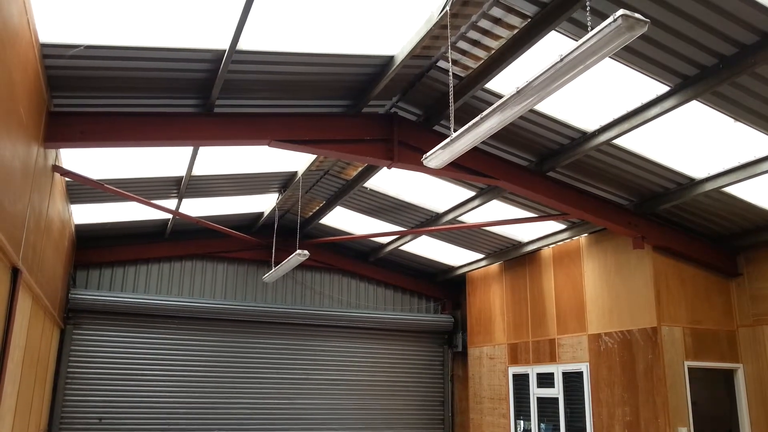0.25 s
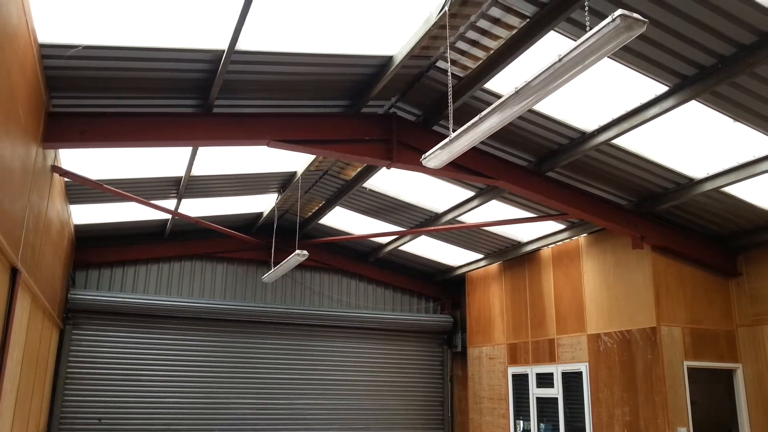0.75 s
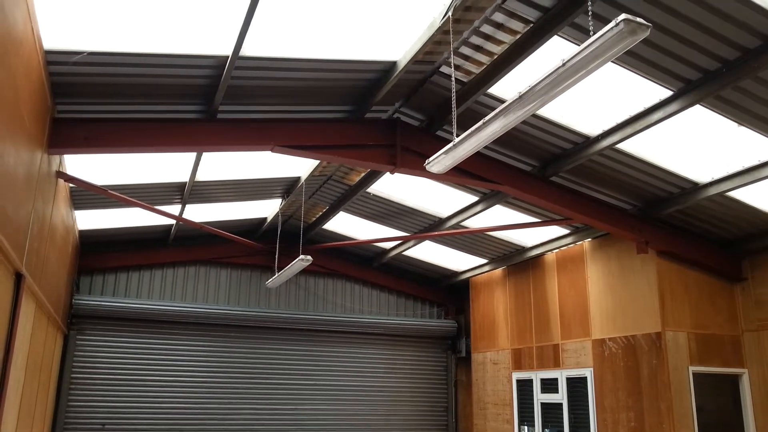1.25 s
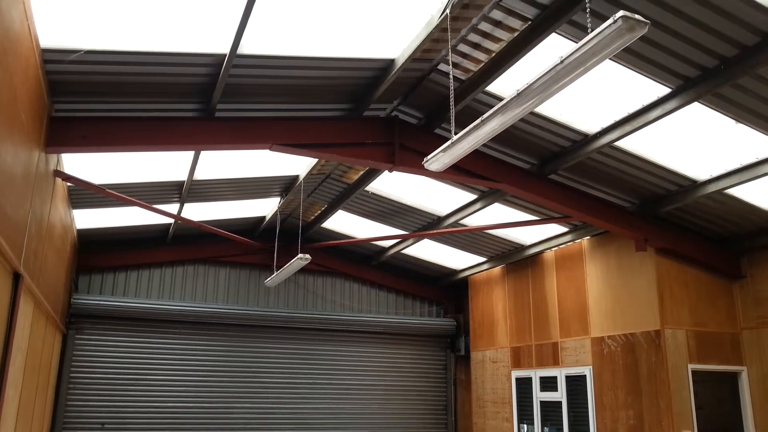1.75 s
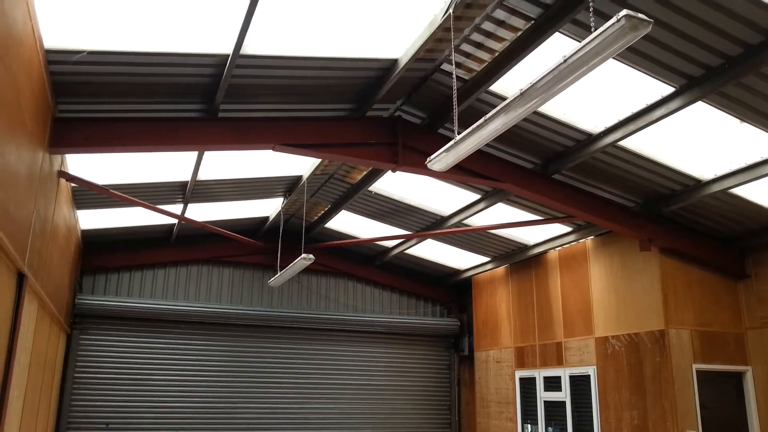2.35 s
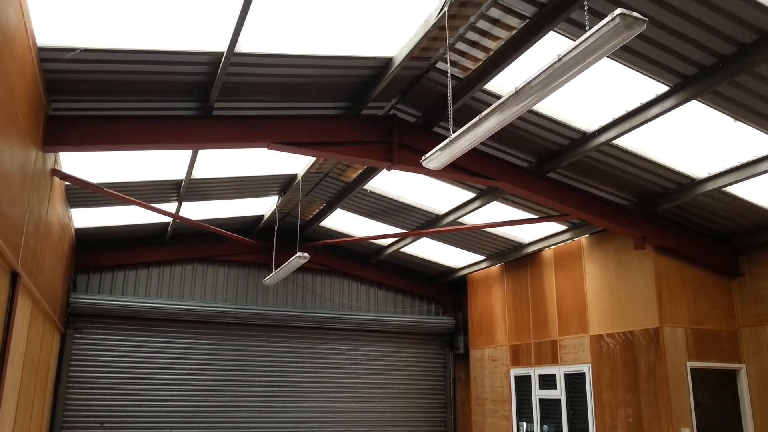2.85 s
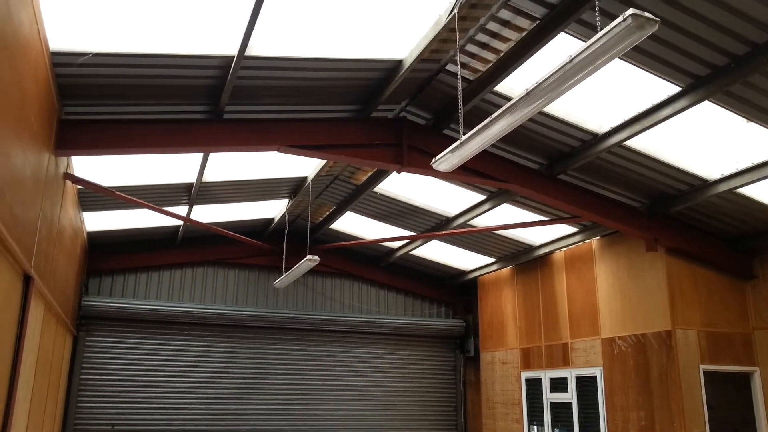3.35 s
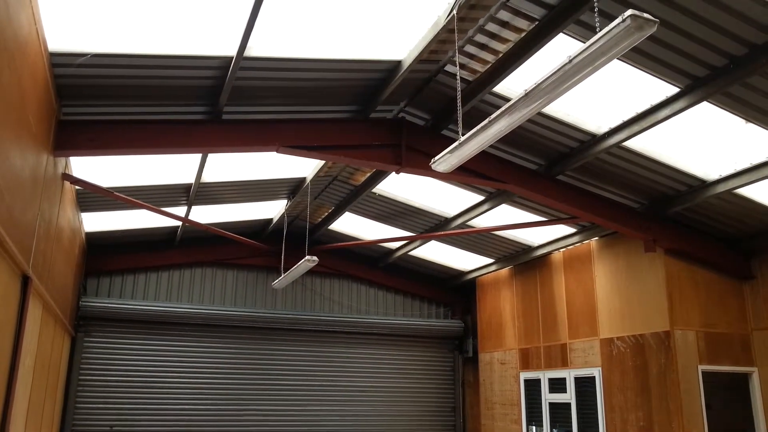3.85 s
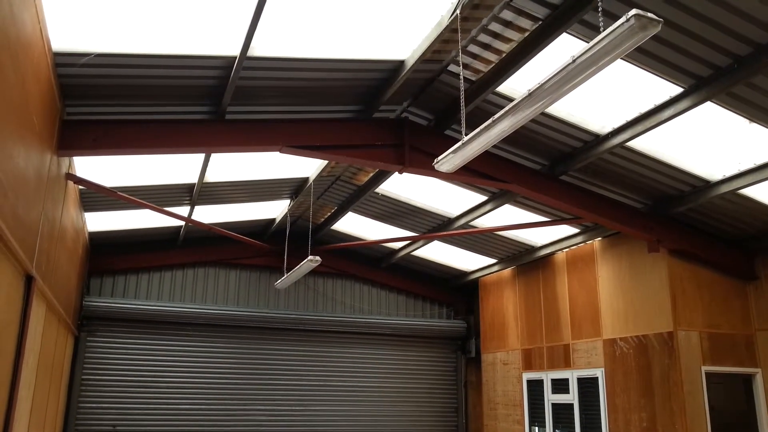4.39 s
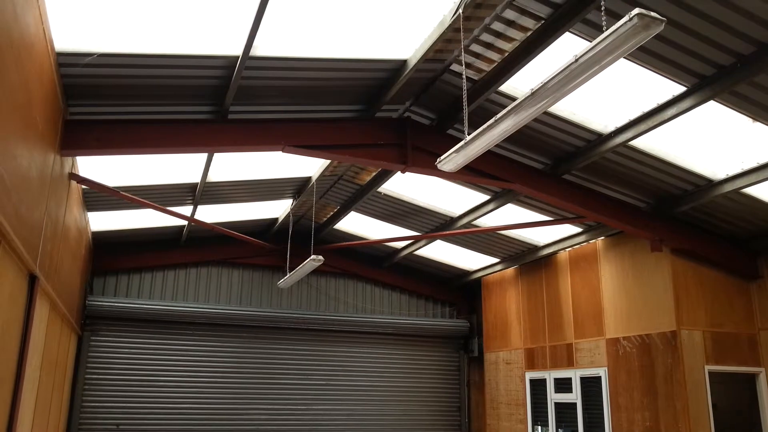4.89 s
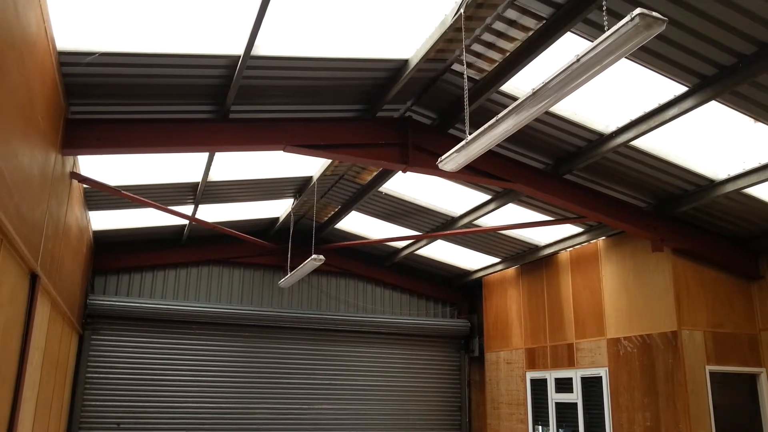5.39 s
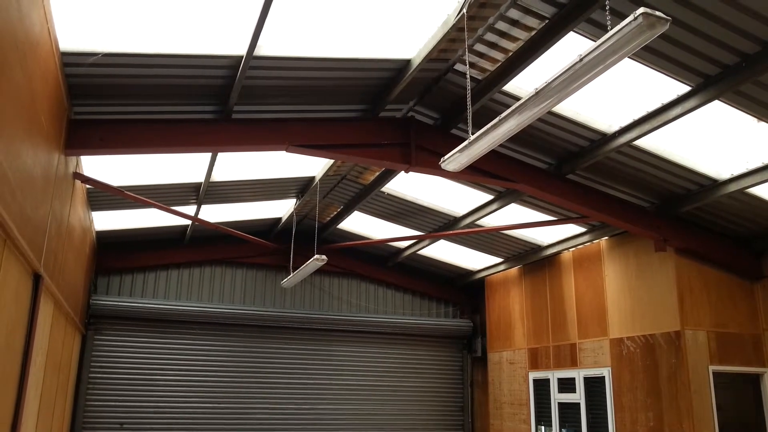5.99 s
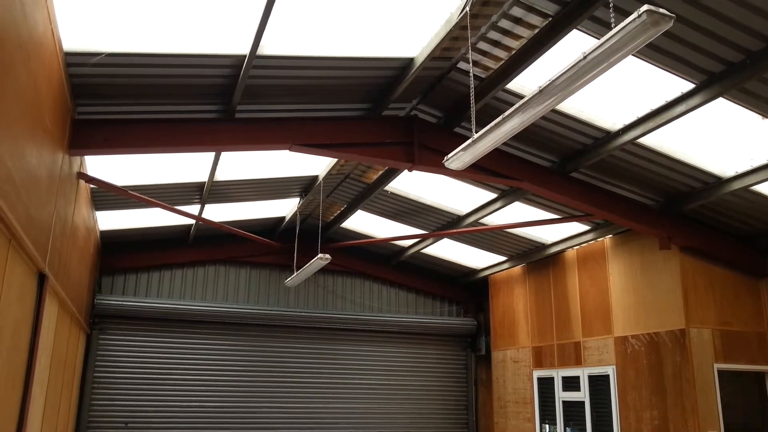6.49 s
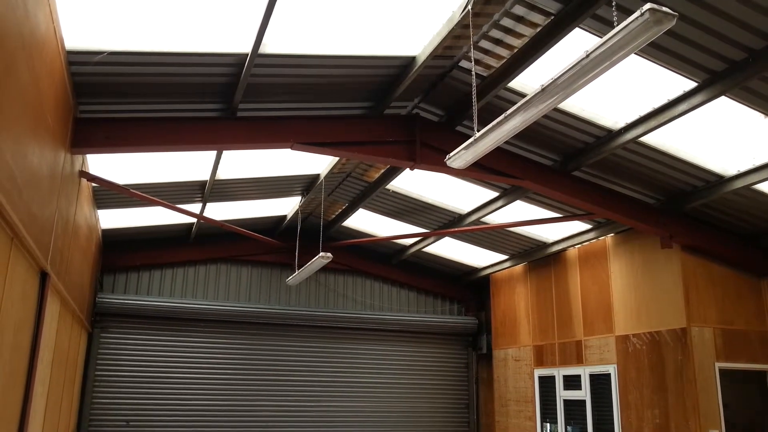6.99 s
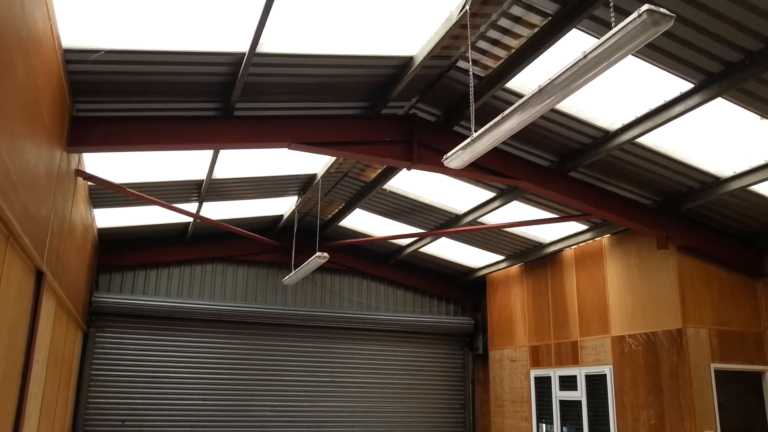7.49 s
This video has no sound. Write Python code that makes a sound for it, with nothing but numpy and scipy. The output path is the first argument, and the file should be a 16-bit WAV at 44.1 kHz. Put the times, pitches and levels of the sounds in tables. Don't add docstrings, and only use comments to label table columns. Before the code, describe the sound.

Swallows under a sheet-metal roof: the ring of a just-ended note, then one close bird chattering in tiny quick phrases, mostly rising, with short gaps. Two faint dull knocks on board come from the yard. Two more distant birds follow with sparser chirps, densest around the middle and then thinning out, with a soft murmur of others. Stereo microphone in an echoing shed, constant low hum and light hiss.

```python
import sys
import numpy as np
from scipy import signal
from scipy.fft import rfft, irfft
from scipy.io import wavfile
from scipy.ndimage import uniform_filter1d

SR = 44100
rng = np.random.default_rng(int(sys.argv[2]) if len(sys.argv) > 2 else 0)


def generate_wav(signal):
    frames = np.transpose(np.atleast_2d(signal))
    scaled = np.clip(frames, -1, 1) * 32767
    pcm = np.round(scaled).astype(np.int16)
    wavfile.write(sys.argv[1], SR, pcm)


def volts_from_decibels(level):
    exponent = np.asarray(level, float) / 20
    return 10 ** exponent


N = 341334


def evened(x):
    return x / np.sqrt(np.mean(x ** 2) + 1e-20)


def read(points, hz):
    f, value = np.transpose(points)
    return np.interp(np.log(hz + 1), np.log(f + 1), value)


def add(mix, s, sound):
    part = mix[..., round(s * SR):][..., :sound.shape[-1]]
    part += sound[..., :part.shape[-1]]


HOLD, STEP, SWEEP, LEAP = (1.05, 0.51), (1.15, 0.85), (1.3, 0.79), (1.55, 0.75)
DROP, DIVE = (.93, 1.204), (.88, 1.1)
HIGH_CHIRP, LOW_CHIRP = (1.11, 2.01), (1.12, 0.508)
HIGH_PIP, LOW_PIP = (1.01, .9), (1.02, .5)


def sung(*parts):
    notes = []
    for (rise, bend), rows in parts:
        for s, length, hz, db in rows:
            notes.append((s, length, hz / rise, hz, db, bend))
    return notes


# frequency in Hz, right over left level in dB.
PERCH_LEAN_DB = [(2500, 4.5), (3800, -1.5), (4800, 5.5), (7500, 3), (12000, -4.5)]


def birds(notes, second_db, third_db, quaver, rasp_db, rasp_hz, late):
    out = np.zeros(N)
    shake, air = rng.standard_normal((2, N + SR))
    shake = evened(uniform_filter1d(uniform_filter1d(shake, 60), 60))
    air = evened(signal.lfilter([1], [1, -np.exp(-2 * np.pi * rasp_hz / SR)], air))
    flutter = 0.11 * np.sin(2 * np.pi * np.cumsum(210 * (1 + 0.202 * shake)) / SR)
    for s, length, start_hz, end_hz, db, bend in notes:
        u = np.arange(0, 1, 1 / (length * SR))
        span = slice(round(s * SR), round(s * SR) + len(u))
        hz = start_hz + (end_hz - start_hz) * u ** bend
        turn = 2 * np.pi * np.cumsum(hz * (1 + quaver * shake[span])) / SR
        swell = np.sin(np.pi * u ** late) ** 0.36
        swell *= 1 + flutter[span]
        second = volts_from_decibels(second_db) * np.sin(2 * turn)
        third = volts_from_decibels(third_db) * np.sin(3 * turn) * (3 * hz < SR / 2)
        hoarse_db = np.clip(1.9 * (-36.0 - db), 0, 16)
        rasp = volts_from_decibels(rasp_db + hoarse_db) * air[span]
        add(out, s, volts_from_decibels(db) * swell * ((1 + rasp) * np.sin(turn) + swell * (second + third)))
    lean = volts_from_decibels(read(PERCH_LEAN_DB, np.fft.rfftfreq(N, 1 / SR)) / 2)
    return irfft(rfft(out) * np.array([1 / lean, lean]), N)


# frequency in Hz, time to fall 60 dB in seconds.
SHED_T60 = [(300, 1), (1500, 0.52), (3000, 1), (5000, 0.7), (7000, 0.59), (14000, 0.88)]
# delay in seconds, left level in dB, right level in dB.
FIRST_ECHOES = [(.0022, -6, -8), (.0041, -8, -6), (.0063, -8, -10), (.0087, -10, -9), (.0118, -10, -11),
                (.016, -11, -10), (.024, -10, -11), (.031, -11, -10)]


def shed(x, first_db, tail_db, alike):
    taps = np.zeros((2, SR))
    at = np.arange(260, SR - 20, 20) + rng.integers(0, 20, (2, (SR - 261) // 20))
    np.put_along_axis(taps, at, rng.choice([-1., 1.], at.shape), 1)
    taps[1] = alike * taps[0] + np.sqrt(1 - alike ** 2) * taps[1]
    hz, t, z = signal.stft(taps, SR, nperseg=256)
    decay = volts_from_decibels(-60 * t / read(SHED_T60, hz)[:, None])
    tail = signal.istft(z * decay, SR, nperseg=256)[1][:, :SR]
    tail *= volts_from_decibels(tail_db) / np.linalg.norm(tail[0])
    tail[:, 0] += volts_from_decibels(first_db)
    for delay, left_db, right_db in FIRST_ECHOES:
        echo = volts_from_decibels(first_db + np.array([left_db, right_db])) * rng.choice([-1, 1], 2)
        tail[:, round(delay * SR * rng.uniform(.9, 1.1))] += echo
    tail[1] = np.roll(tail[1], 8)
    return signal.fftconvolve(x, tail, axes=1)[:, :N]


# start in seconds, length in seconds, start pitch in Hz,
# end pitch in Hz, level in dB, bend as a bare exponent.
FADING_NOTE = [
    (0, 0.0108, 4300, 5100, -35, 1),
]


def fading_note():
    voice = birds(FADING_NOTE, second_db=-40, third_db=-48, quaver=0.072, rasp_db=-5.0, rasp_hz=700, late=0.36)
    return shed(voice, first_db=-4.0, tail_db=2.5, alike=0.14)


# frequency in Hz, density in dB per Hz.
HUM_SPECTRUM = [(12, -47.5), (20, -28.5), (245, -2.5), (393, -2.5), (427, -3), (519, -4), (667, -3),
                (811, -3), (3260, -15), (3640, -5.5), (4950, -13), (13900, -18.5), (15500, -24)]
# frequency in Hz, left-right likeness from -1 to 1.
HUM_LIKENESS = [(60, 0.13), (240, 0.68), (950, 0.11), (3770, -0.017), (15000, -0.031)]
# frequency in Hz, left over right level in dB.
HUM_LEAN_DB = [(60, 0.5), (240, -0.5), (950, -2), (3770, -1.5), (15000, -4.5)]


def hum():
    frames, hz = N // 256 + 5, np.fft.rfftfreq(1024, 1 / SR)
    a, b, c, d, patches = rng.standard_normal((frames, 513, 5)).T
    patches = evened(uniform_filter1d(uniform_filter1d(patches, 12, 0), 20, 1))
    t = np.arange(frames) * 256 / SR
    swell = np.zeros(frames)
    for f in np.geomspace(.15, 3, 20):
        swell += np.sin(2 * np.pi * (f * t + rng.random())) / np.sqrt(f)
    same = np.clip(read(HUM_LIKENESS, hz), -1, 1)[:, None]
    left = a + 1j * b
    z = np.array([left, same * left + np.sqrt(1 - same ** 2) * (c + 1j * d)])
    lean_db = read(HUM_LEAN_DB, hz)[:, None] * np.array([.5, -.5])[:, None, None]
    z *= volts_from_decibels(read(HUM_SPECTRUM, hz)[:, None] + lean_db + 1.05 * patches + 0.21 * evened(swell))
    return volts_from_decibels(-49.5) * evened(signal.istft(z, nperseg=1024, noverlap=768)[1][:, :N])


# start in seconds, length in seconds, end pitch in Hz, level in dB.
NEAR_HOLDS = [(0.36, 0.015, 5920, -23.5), (0.479, 0.011, 4790, -19.5), (.577, 0.012, 5150, -14),
              (0.729, 0.018, 5525, -25.5), (1.428, 0.017, 4800, -22.5), (1.704, .006, 4490, -11.5),
              (1.19, 0.0156, 4830, -26), (1.699, 0.023, 4703, -14), (1.731, 0.0171, 5228, -15.5),
              (2.127, 0.043, 3713, -27), (2.172, 0.012, 4639, -12), (2.271, 0.012, 3656, -19),
              (2.199, 0.012, 5160, -15.5), (2.58, .026, 4000, -19.5), (2.571, 0.015, 4517, -26.5),
              (2.719, 0.027, 4554, -21.5), (2.721, 0.0124, 2270, -35.5), (2.742, 0.0082, 3210, -32),
              (2.8, 0.0163, 4560, -22.5), (2.99, 0.012, 3334, -30.5), (3.178, .008, 3290, -26),
              (3.249, 0.0084, 3196, -28), (2.006, 0.021, 4200, -22), (3.408, 0.012, 6322, -37),
              (3.412, .01, 7210, -38.5), (3.283, 0.013, 4680, -21)]
# start in seconds, length in seconds, end pitch in Hz, level in dB.
NEAR_STEPS = [(.254, 0.011, 6230, -25.5), (.325, 0.022, 5500, -30), (.256, .014, 4400, -27.5),
              (.352, .012, 5460, -23.5), (0.787, 0.015, 4275, -25.5), (0.802, 0.023, 4650, -24),
              (1.124, 0.019, 5580, -35), (1.211, 0.024, 5562, -20), (1.336, 0.0045, 3730, -23.5),
              (1.361, 0.014, 3920, -27), (1.519, 0.014, 3915, -18.5), (1.851, 0.012, 3311, -35.5),
              (1.887, 0.0071, 3770, -25), (2.03, 0.024, 4937, -20), (2.354, 0.011, 3700, -19.5),
              (2.33, 0.0135, 4370, -18.5), (2.703, 0.0075, 3530, -21.5), (2.802, .012, 7450, -38),
              (2.736, 0.017, 6800, -35.5), (3.248, 0.012, 4210, -24), (3.377, 0.045, 4596, -33.5),
              (3.393, 0.052, 5300, -29), (1.549, 0.0049, 3490, -16.5), (1.555, 0.007, 3900, -20.5),
              (0.782, 0.016, 6870, -41), (1.99, 0.0266, 4260, -32)]
# start in seconds, length in seconds, end pitch in Hz, level in dB.
NEAR_SWEEPS = [(0.148, 0.0075, 5420, -30), (0.724, 0.016, 4330, -23), (.824, 0.014, 5180, -12.5),
               (1.123, 0.012, 4430, -18.5), (1.359, 0.008, 8200, -29), (1.442, 0.021, 5747, -13.5),
               (1.691, 0.015, 4750, -12.5), (1.723, 0.027, 8460, -41), (1.73, 0.0066, 7060, -34),
               (2.043, 0.017, 3923, -15), (2.152, 0.02, 4810, -11), (2.198, 0.013, 4190, -13),
               (2.264, 0.0079, 3685, -19), (2.597, 0.0173, 5211, -21.5), (2.805, 0.0113, 4390, -18),
               (2.842, 0.011, 5300, -24.5), (3.002, 0.012, 4220, -20), (3.033, 0.015, 5278, -21.5),
               (3.208, .012, 4000, -25), (3.18, 0.0323, 5210, -30), (3.17, .05, 2643, -39.5),
               (3.383, 0.0242, 2820, -38), (3.19, .014, 3680, -29), (3.271, 0.015, 4881, -18.5),
               (3.256, 0.021, 8100, -52), (3.409, 0.015, 3520, -32.5), (0.467, 0.015, 4850, -20.5),
               (.566, 0.011, 5125, -14), (1.728, 0.01187, 4175, -12.5), (1.862, 0.0249, 4266, -28.5),
               (1.45, .014, 4714, -17.5)]
# start in seconds, length in seconds, end pitch in Hz, level in dB.
NEAR_LEAPS = [(.139, 0.023, 6170, -29), (0.236, 0.023, 5580, -28.5), (.47, 0.007, 6700, -22.5),
              (.565, 0.007, 7556, -26), (0.728, 0.012, 5560, -22.5), (0.821, 0.0085, 7390, -28),
              (1.34, 0.028, 5600, -23.5), (1.356, 0.01614, 5800, -13), (1.875, 0.022, 3620, -24.5),
              (2.252, 0.0165, 2678, -29.5), (2.322, 0.038, 5140, -29.5), (2.736, 0.017, 7250, -27),
              (2.837, 0.014, 4274, -20.5), (3.205, 0.015, 7500, -40), (3.41, 0.0132, 7400, -42)]
# start in seconds, length in seconds, end pitch in Hz, level in dB.
NEAR_DROPS = [(0.53, 0.027, 4750, -25), (.452, 0.017, 3200, -31), (1.075, 0.038, 3060, -43),
              (.469, 0.01, 5100, -25), (1.084, 0.045, 3850, -28.5), (1.789, 0.0092, 3270, -17.5),
              (2.034, 0.011, 7170, -40.5), (2.685, 0.014, 2750, -37), (2.683, 0.008, 7100, -38),
              (3.014, 0.018, 4020, -17.5), (0.64, 0.0269, 4000, -22.5), (2.2, 0.0242, 3360, -26),
              (2.787, .011, 3880, -19.5), (1.678, 0.015, 3800, -27), (3.348, 0.012, 5520, -38)]
# start in seconds, length in seconds, end pitch in Hz, level in dB.
NEAR_DIVES = [
    (.574, .012, 6400, -36),
    (3.369, .017, 5250, -31),
    (3.383, .01, 6700, -42),
    (2.796, .011, 3500, -24),
    (3.262, .013, 3750, -14),
]


def near_bird():
    notes = sung((HOLD, NEAR_HOLDS), (STEP, NEAR_STEPS), (SWEEP, NEAR_SWEEPS), (LEAP, NEAR_LEAPS),
                 (DROP, NEAR_DROPS), (DIVE, NEAR_DIVES))
    voice = birds(notes, second_db=-31, third_db=-48, quaver=0.013, rasp_db=-21.5, rasp_hz=900, late=1.18)
    return shed(voice, first_db=-3.5, tail_db=-1.5, alike=0.014)


# start in seconds, level in dB, body resonance in Hz, body width in Hz.
WOOD_KNOCKS = [
    (2.456, -47.5, 718, 540),
    (3.896, -45, 900, 900),
]


def knocks():
    out, t = np.zeros(N), np.arange(2000) / SR
    for (s, db, hz, width), blow in zip(WOOD_KNOCKS, rng.standard_normal((len(WOOD_KNOCKS), 2000))):
        body = signal.iirpeak(hz, hz / width, SR)
        add(out, s, volts_from_decibels(db) * evened(signal.lfilter(*body, blow * np.exp(-t / 0.044))))
    return out


# start in seconds, length in seconds, end pitch in Hz, level in dB.
FAR_HIGH_CHIRPS = [(3.74, 0.046, 6900, -46), (3.869, 0.041, 6540, -35.5), (4.708, 0.03, 6660, -43),
                   (4.85, 0.019, 6580, -28.5), (4.955, 0.0458, 6626, -30), (5.097, 0.0225, 6590, -23.5),
                   (5.195, 0.056, 5250, -30), (5.227, 0.013, 6150, -26), (5.232, 0.01, 6800, -19.5),
                   (5.356, .016, 6350, -22), (5.368, 0.013, 6733, -30), (5.484, 0.018, 6440, -23.5),
                   (5.612, 0.023, 6430, -26.5), (5.737, 0.021, 6270, -26), (6.291, 0.029, 6100, -49),
                   (6.445, 0.026, 6668, -33.5), (6.557, 0.035, 5250, -45), (6.578, 0.016, 6570, -27.5),
                   (6.713, 0.014, 6477, -28), (7.425, 0.013, 5640, -38), (7.703, 0.039, 6282, -37)]
# start in seconds, length in seconds, end pitch in Hz, level in dB.
FAR_HIGH_PIPS = [(3.824, 0.025, 5930, -42), (4.586, 0.038, 6110, -46.5), (4.556, 0.0192, 4150, -45.5),
                 (5.231, 0.0156, 6720, -27), (6.395, 0.018, 6360, -42), (6.545, 0.014, 5786, -35),
                 (6.664, 0.055, 5940, -37), (6.832, 0.014, 6130, -28.5), (6.918, 0.0294, 6140, -31),
                 (6.954, 0.017, 5950, -33), (7.268, .013, 6049, -34), (7.58, 0.03, 5597, -46)]
# start in seconds, length in seconds, end pitch in Hz, level in dB.
FAR_LOW_CHIRPS = [(3.76, 0.036, 5010, -38), (4.721, 0.058, 4790, -36.5), (4.83, 0.041, 4910, -53),
                  (5.08, 0.0425, 4580, -43), (5.112, 0.019, 5090, -24), (5.228, 0.021, 4700, -26),
                  (5.243, 0.015, 5210, -18.5), (5.368, 0.0203, 4860, -21.5), (5.5, 0.0184, 4880, -22),
                  (5.745, 0.024, 4710, -24), (6.407, 0.066, 4400, -40), (6.68, 0.038, 4540, -46),
                  (6.949, 0.026, 4664, -39)]
# start in seconds, length in seconds, end pitch in Hz, level in dB.
FAR_LOW_PIPS = [(3.885, 0.014, 4320, -34), (3.9, 0.013, 4770, -27), (4.617, 0.055, 4906, -32),
                (4.698, 0.011, 4040, -39), (4.995, 0.016, 4715, -26.5), (5.62, 0.023, 4710, -25.5),
                (5.343, 0.022, 5620, -27), (5.475, .016, 5750, -33), (6.334, 0.028, 4780, -35),
                (6.463, 0.019, 4490, -27), (6.834, 0.0234, 4410, -26.5), (7.105, 0.038, 4090, -32.5),
                (7.129, 0.045, 4290, -32.5), (7.254, 0.033, 4342, -27.5), (7.457, 0.039, 4533, -28),
                (7.603, 0.028, 4140, -30.5), (7.716, 0.016, 4450, -27.5)]
# start in seconds, length in seconds, end pitch in Hz, level in dB.
FAR_HIGH_DROPS = [(4.7, 0.03, 6050, -42), (4.945, 0.016, 5850, -38.5), (5.562, 0.0212, 5920, -39),
                  (5.707, 0.0217, 5800, -35.5), (6.315, 0.03, 5460, -51.5), (7.226, 0.0226, 5780, -37)]
# start in seconds, length in seconds, end pitch in Hz, level in dB.
FAR_HIGH_DIVES = [(5.059, 0.0334, 5650, -33.5), (5.183, 0.0275, 5600, -31), (5.433, 0.0304, 5680, -32.5)]
# start in seconds, length in seconds, end pitch in Hz,
# level in dB.
FAR_LEAD_INS = [(5.088, 0.027, 3830, -45), (5.212, 0.027, 3800, -43), (5.336, .025, 3830, -38),
                (5.468, 0.028, 3830, -43), (5.59, .028, 3800, -43), (5.715, 0.022, 3780, -43)]


def far_birds():
    notes = sung((HIGH_CHIRP, FAR_HIGH_CHIRPS), (HIGH_PIP, FAR_HIGH_PIPS), (LOW_CHIRP, FAR_LOW_CHIRPS),
                 (LOW_PIP, FAR_LOW_PIPS), (DROP, FAR_HIGH_DROPS), (DIVE, FAR_HIGH_DIVES), (DROP, FAR_LEAD_INS))
    voices = birds(notes, second_db=-26, third_db=-46, quaver=0.0084, rasp_db=-24.5, rasp_hz=1380, late=1.3)
    return shed(voices, first_db=-6.5, tail_db=-5.0, alike=0.029)


# start in seconds, end in seconds, level in dB.
FLOCK_MUTTER = [
    (4.622, 4.8, -56.5),
    (4.799, 5.2, -47.5),
    (5.2, 5.5, -40.5),
    (5.499, 5.8, -46.5),
    (6.387, 6.75, -50),
    (6.75, 7.294, -58.5),
    (7.57, 7.74, -51),
]


def flock():
    gap_s, length_s, low_hz, high_hz, spread_db = .022, .016, 4650, 6200, 4
    notes = []
    for start, end, db in FLOCK_MUTTER:
        at = np.arange(start, end, gap_s)
        late, long, high, rise, loud = rng.random((len(at), 5)).T
        hz = low_hz + (high_hz - low_hz) * high
        start_hz = hz / (0.97 + 0.3484 * rise)
        level_db = db + spread_db * (2 * loud - 1)
        notes += zip(at + gap_s * late, length_s * (.5 + long), start_hz, hz, level_db, np.ones(len(at)))
    voices = birds(notes, second_db=-42, third_db=-46, quaver=0.02, rasp_db=-17.5, rasp_hz=900, late=0.54)
    return shed(voices, first_db=-2.5, tail_db=3.0, alike=0.038)


# start in seconds, length in seconds, pitch in Hz, level in dB.
FAR_WHISTLE = [
    (4.63, .09, 2600, -58),
    (4.725, .06, 2600, -52),
    (4.785, .045, 2610, -52),
    (4.83, .035, 2600, -53),
    (4.865, .04, 2620, -55),
    (4.91, .1, 2610, -52),
    (5.01, .05, 2600, -56),
    (5.07, .18, 2400, -60),
]


def whistle():
    out = np.zeros(N)
    waver = evened(uniform_filter1d(rng.standard_normal(N + SR), 900))
    for s, length, hz, db in FAR_WHISTLE:
        t = np.arange(0, length, 1 / SR)
        pitch = hz * (1 + 0.004 * waver[round(s * SR):][:len(t)])
        tone = np.sin(2 * np.pi * np.cumsum(pitch) / SR)
        add(out, s, volts_from_decibels(db) * tone * signal.windows.tukey(len(t), .4))
    return out


def scene():
    mix = fading_note() + hum() + near_bird() + far_birds() + flock()
    yard = np.array([1, 1])[:, None] * (knocks() + whistle())
    return mix + shed(yard, first_db=0, tail_db=1.5, alike=0.15)


def roll_off(x):
    return signal.sosfilt(signal.butter(12, 14650, fs=SR, output="sos"), x)


def record(dry):
    knee = np.maximum(abs(dry) - .08, 0)
    cube = dry * dry ** 2
    lopsided = signal.sosfilt(signal.butter(8, 500, "high", fs=SR, output="sos"), dry ** 2)
    bent = dry + 0.1766 * lopsided - 0.012 * np.sign(dry) * knee - 0.097 * cube
    bent += 0.71 * signal.sosfilt(signal.butter(4, 10500, "high", fs=SR, output="sos"), cube)
    bent = signal.lfilter(*signal.butter(1, 60, "high", fs=SR), bent)
    return roll_off(bent)


dry = scene()
out = record(dry)
generate_wav(out)
```